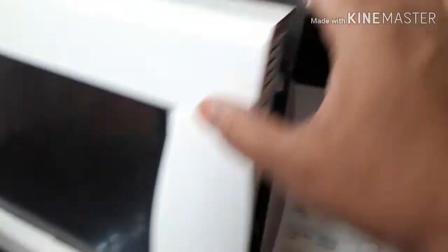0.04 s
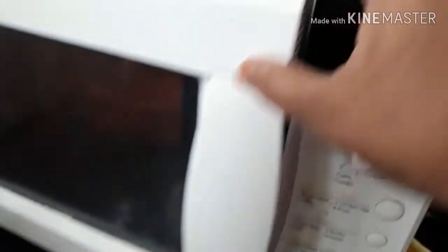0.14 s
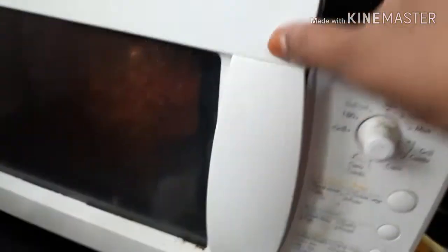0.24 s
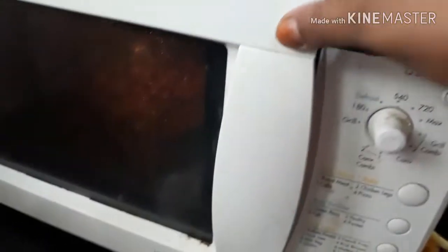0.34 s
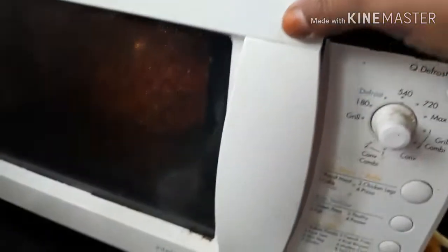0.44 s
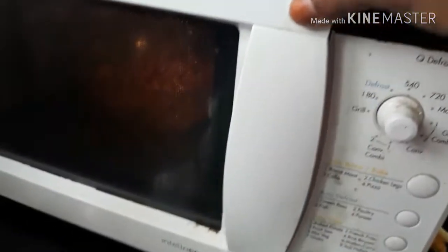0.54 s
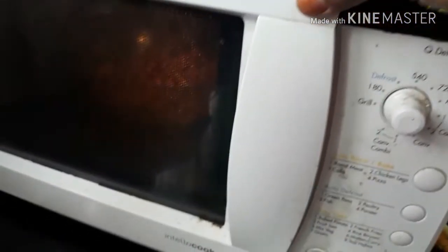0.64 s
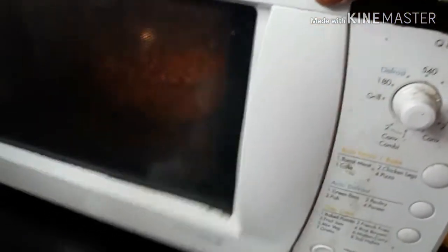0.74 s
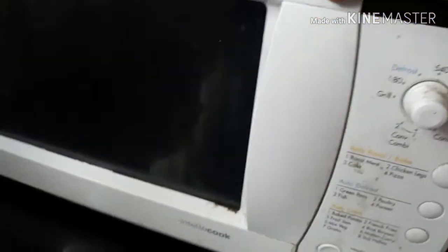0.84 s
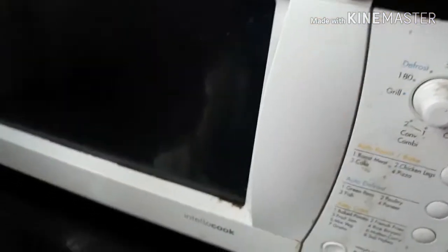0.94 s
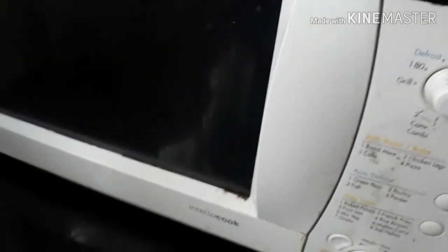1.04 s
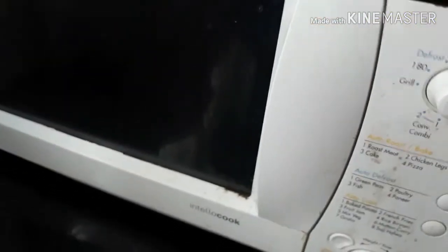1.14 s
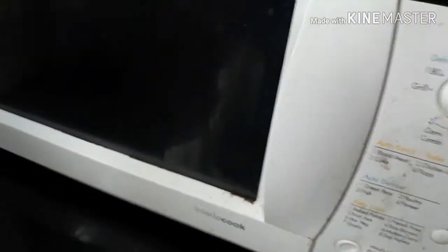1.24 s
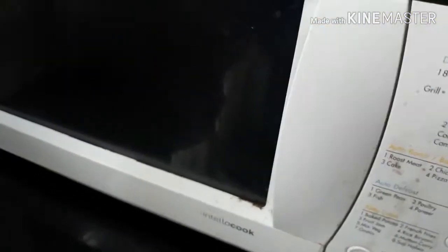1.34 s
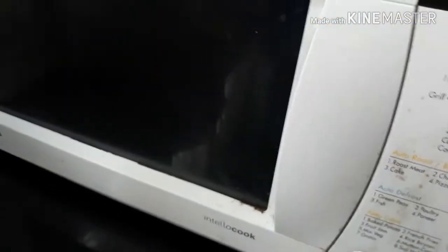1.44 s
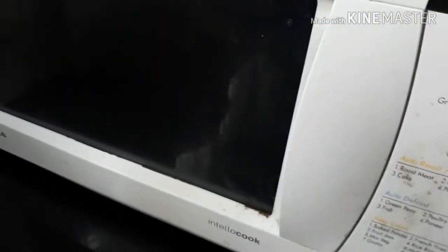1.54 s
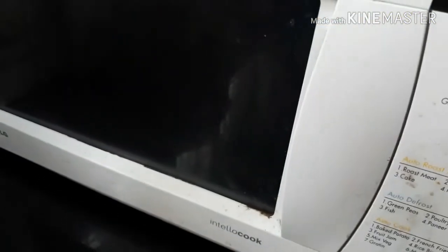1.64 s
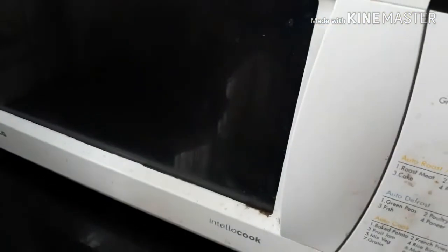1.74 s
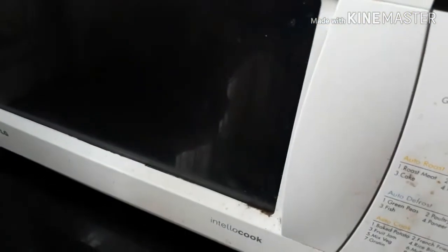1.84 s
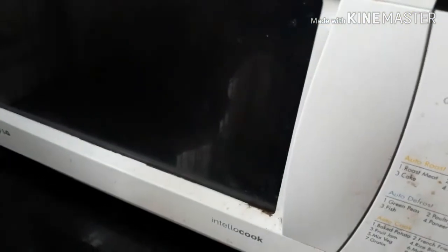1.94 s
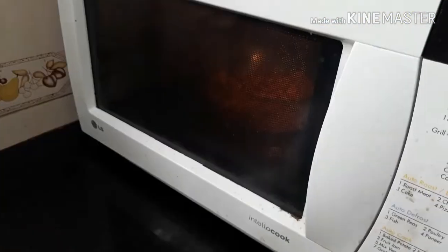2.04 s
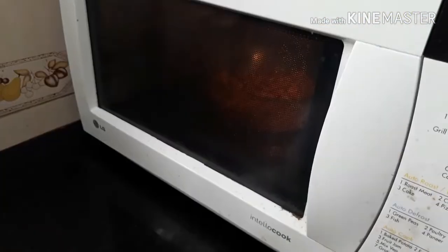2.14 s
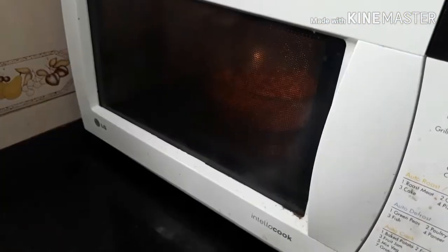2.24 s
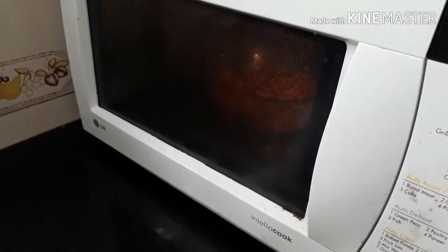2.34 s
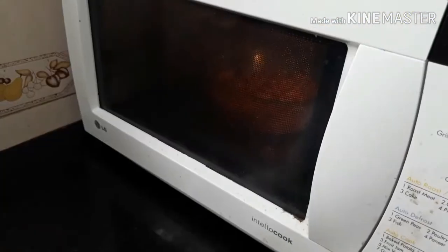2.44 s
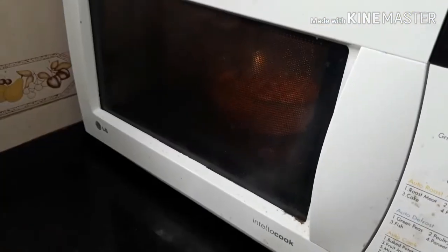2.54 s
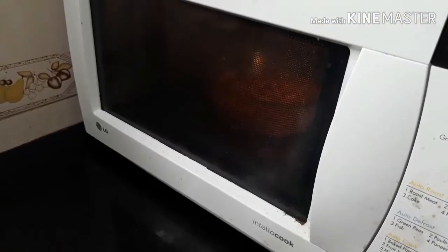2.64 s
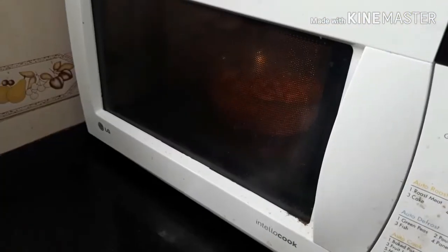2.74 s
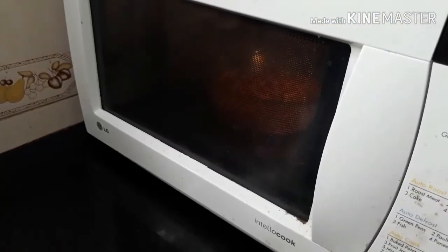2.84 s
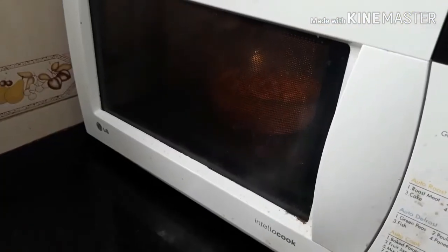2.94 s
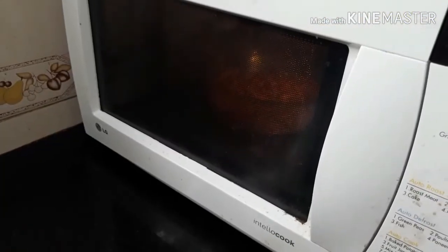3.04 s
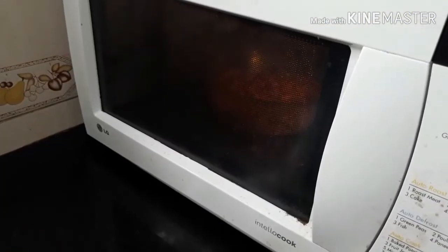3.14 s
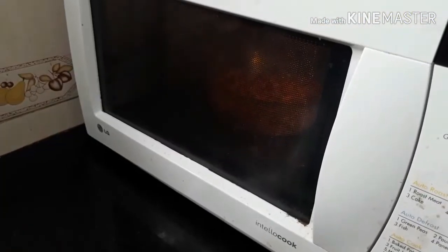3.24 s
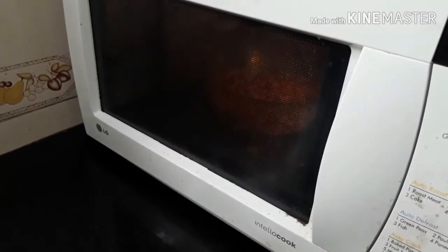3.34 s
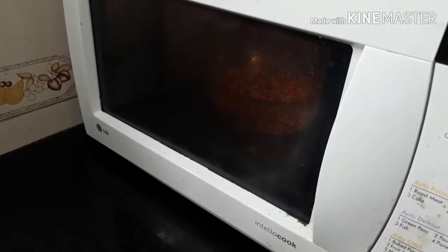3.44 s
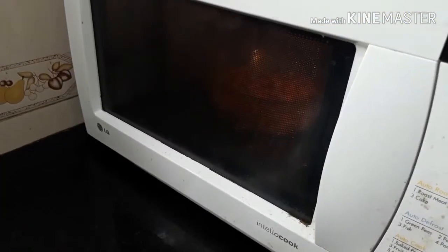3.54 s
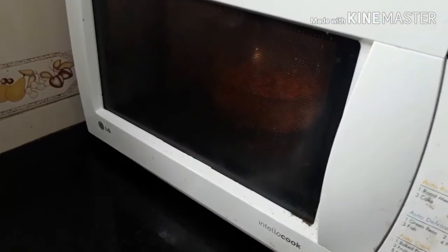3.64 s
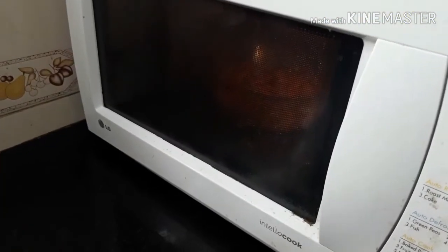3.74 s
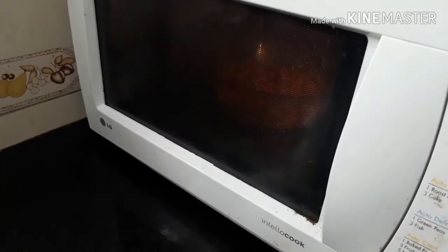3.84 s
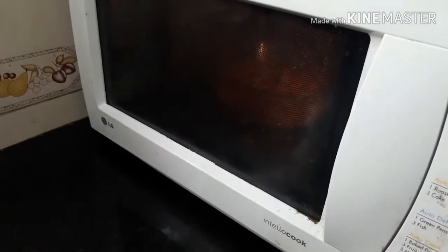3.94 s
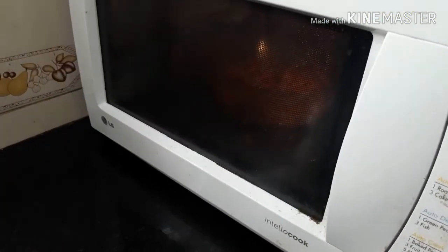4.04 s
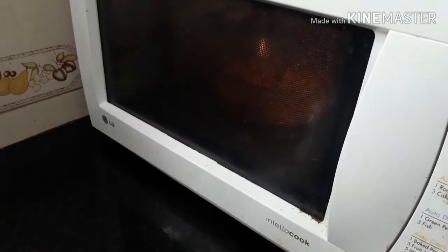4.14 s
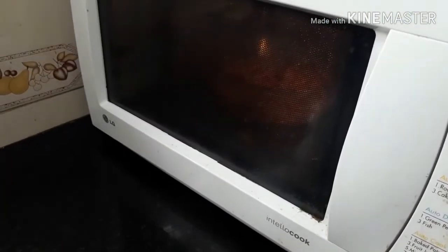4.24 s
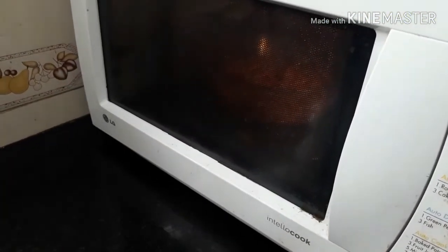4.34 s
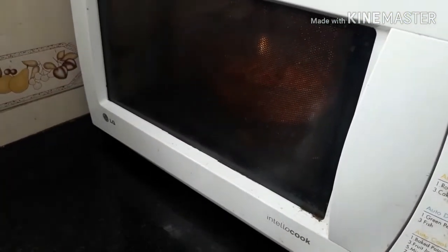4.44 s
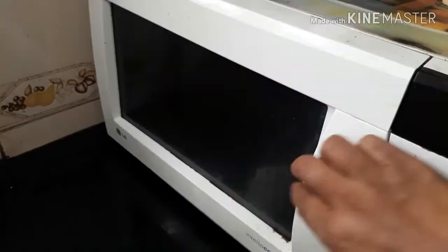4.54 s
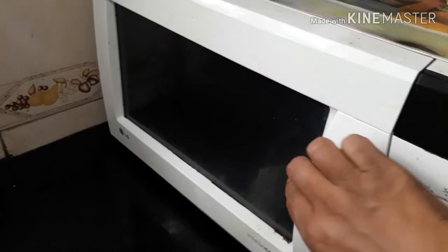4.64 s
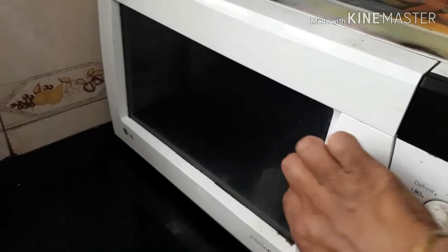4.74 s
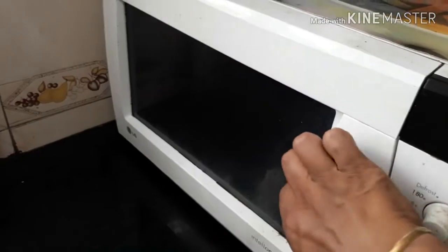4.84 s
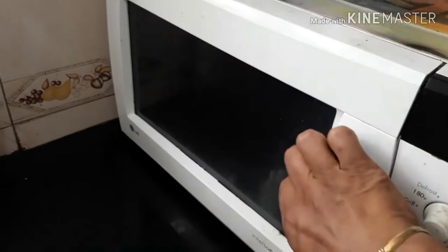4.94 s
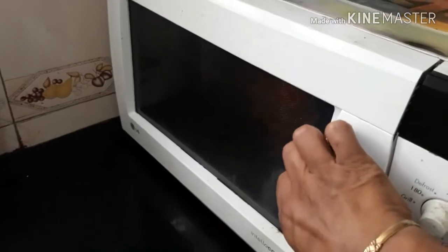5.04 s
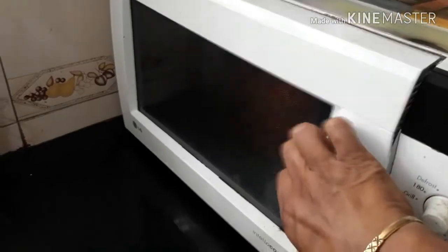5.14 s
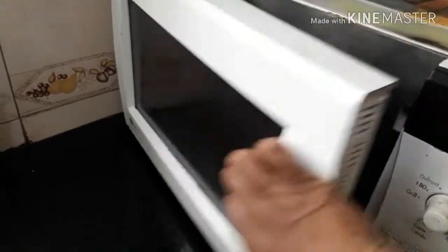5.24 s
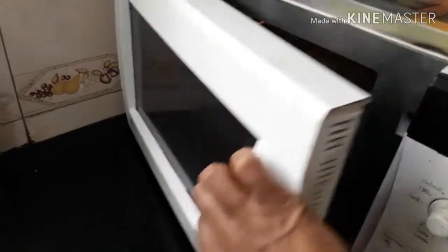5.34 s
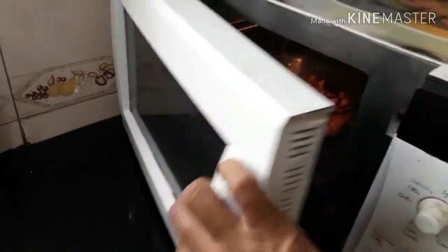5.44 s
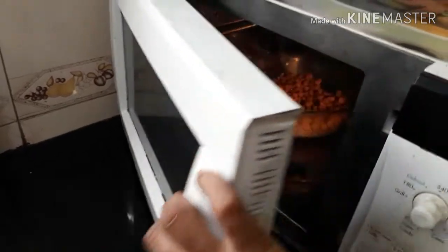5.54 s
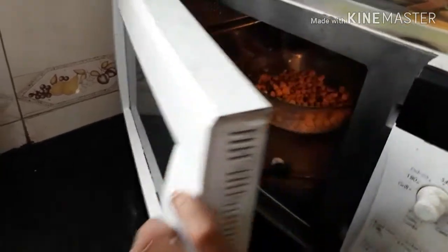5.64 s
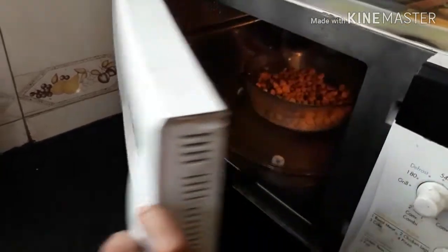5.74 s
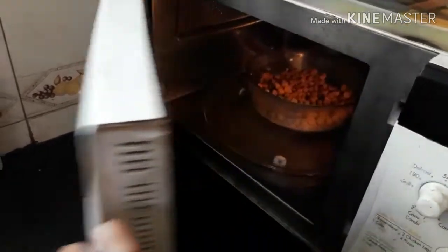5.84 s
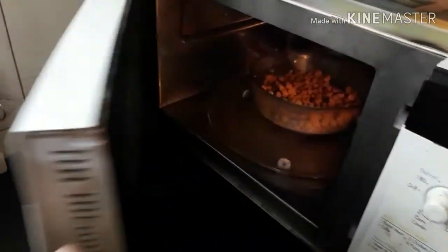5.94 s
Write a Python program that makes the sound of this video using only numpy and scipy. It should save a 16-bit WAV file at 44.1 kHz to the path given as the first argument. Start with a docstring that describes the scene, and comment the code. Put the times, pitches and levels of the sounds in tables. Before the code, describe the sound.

Sharp latch snaps and a hard door slam, a steady microwave hum with whirring fan, then clicking and a clunk as the door opens.

```python
"""A microwave oven in a tiled kitchen, heard from close by on a small microphone at three moments.
First the door is pushed to over a quiet room: its sprung latch snaps and it slams into the steel case.
After a short fade the oven runs: mains hum, fan tones and panel buzz from sines, rushing air from noise.
After another fade the latch creaks under a pull and the door jumps open amid a slowly swelling hiss;
last, a hand rubs on the swinging door. Blows are ringing modes with a rattle of noise bands."""
import sys
import numpy as np
from scipy import signal
from scipy.fft import rfft, irfft, next_fast_len
from scipy.io import wavfile

SR = 44100
rng = np.random.default_rng(int(sys.argv[2]) if len(sys.argv) > 2 else 0)


def output_pcm(signal):
    """Save a mono or channel-first signal as 16-bit PCM at the path in sys.argv[1].

    Samples are clipped to [-1, 1] before scaling.
    """
    pcm = np.clip(np.atleast_2d(signal).T, -1, 1) * 32767
    wavfile.write(sys.argv[1], SR, np.round(pcm).astype(np.int16))


N = 264159
TIME = np.arange(N) / SR
AGE = TIME[:2 * SR]   # seconds since a hit


def from_db(db):
    """Decibels to amplitude gain."""
    return 10 ** (np.asarray(db) / 20)


def rms_one(x):
    """Scale to unit rms."""
    return x / np.sqrt(np.mean(x ** 2) + 1e-20)


def at_hz(points, hz):
    """Read a table on a log-frequency axis."""
    f, value = np.transpose(points)
    return np.interp(np.log(hz + 1e-9), np.log(f), value)


def add(track, s, sound):
    """Mix a sound in at time s."""
    i = round(s * SR)
    track[i:i + len(sound)] += sound[:N - i]


def drift(rate_hz):
    """Smooth random wander of spread 1, slower for a lower rate."""
    size, step = 4096, 100   # one point every 100 samples
    hz = np.fft.rfftfreq(size, step / SR)
    slow = irfft(rfft(rng.standard_normal(size)) / (1 + (hz / rate_hz) ** 2))
    return np.interp(np.arange(N) / step, np.arange(len(slow)), rms_one(slow))


def noise(spectrum, resonances=(), ripple_db=2.0):
    """Steady noise of a given colour, raised or dipped at resonances and rippled by standing waves; rms 1."""
    size = next_fast_len(N)
    hz = np.fft.rfftfreq(size, 1 / SR)
    db = at_hz(spectrum, hz)
    for centre, width, top_db in resonances:
        db = db + top_db / (1 + (2 * (hz - centre) / width) ** 2)
    nodes = np.arange(800, 16000, 20)
    db = db + ripple_db * np.interp(hz, nodes, rng.standard_normal(len(nodes)), left=0)
    return rms_one(irfft(rfft(rng.standard_normal(size)) * from_db(db), size)[:N])


def tilt(hz, bass_db, treble_db, bass_hz=260, treble_hz=3200):
    """A heavy hit wakes the bass, a hard one the treble."""
    bass = bass_db / (1 + (hz / bass_hz) ** 4)
    treble = treble_db / (1 + (treble_hz / hz) ** 2)
    return bass + treble


# Reverberation of the tiled kitchen. Each row: frequency in Hz, time to fall 60 dB in seconds.
KITCHEN_REVERB = [(50, 0.68), (120, 0.81), (250, 0.88), (500, 0.55), (1000, 0.43), (3000, 0.41),
                  (7000, 0.32), (15000, 0.17)]


def rattle(spectrum, t60, room_db, spread, grit_db=0.0):
    """Countless modes, one row per third octave: a quick crack, gritty if asked, then the kitchen's tail."""
    edges = 2 ** (np.arange(15, 43) / 3)
    centres = np.sqrt(edges[1:] * edges[:-1])
    share = from_db(at_hz(spectrum, centres)) * np.sqrt(np.diff(edges))
    chatter_db = grit_db * drift(150)[:len(AGE)]   # loose parts buzz against each other
    rows = []
    for low, high, hz in zip(edges, edges[1:], centres):
        third_octave = signal.butter(2, [low, high], "band", fs=SR, output="sos")
        band = signal.sosfilt(third_octave, rng.standard_normal(len(AGE)))
        direct = from_db(chatter_db * hz / (hz + 1500)) * 1000 ** (-AGE / (t60 + 2 / hz))
        tail = from_db(room_db) * 1000 ** (-AGE / at_hz(KITCHEN_REVERB, hz))
        # bending waves: the lows arrive later; spread is the rise in seconds at 1 kHz
        rise = 1 - np.exp(-AGE / spread * (hz / 1000) ** .5)
        rows.append(rms_one(band) * rise * np.hypot(direct, tail))
    return centres, np.array(rows) * (share / np.linalg.norm(share))[:, None]


def ringing(hits, modes, swell_cycles=0.94):
    """Every hit feeds energy into every mode over about a cycle; each mode loses it at its own rate."""
    s, db, bass_db, treble_db = np.transpose(hits)
    at = np.round(s * SR).astype(int)
    out = np.zeros(N)
    for hz, mode_db, t60 in modes:
        hit_energy = from_db(db + mode_db + tilt(hz, bass_db, treble_db)) ** 2
        fed = np.bincount(at, hit_energy, N) + 1e-20
        ease = np.exp(-hz / (swell_cycles * SR))   # rise of the energy, per sample
        loss = 1e-6 ** (1 / (t60 * SR))   # energy kept, per sample
        energy = signal.lfilter([1 - ease], np.poly([ease, loss]), fed)
        out += np.sqrt(np.abs(energy)) * np.sin(2 * np.pi * (hz * TIME + rng.random()))
    return out


def strike(hits, modes, panels, scatter_db=3.5):
    """Each hit rattles the panels and sets the strong modes ringing."""
    hz, bands = panels
    out = ringing(hits, modes)
    for s, db, bass_db, treble_db in hits:
        band_db = db + tilt(hz, bass_db, treble_db) + rng.normal(0, scatter_db, len(hz))
        add(out, s, from_db(band_db) @ bands)
    return out


# Snaps of the sprung latch, closing and then opening. Each row: start in seconds, level in dB.
LATCH_SNAPS = [(0.22, -48), (0.2639, -14.5), (0.2743, -15), (0.4100, -17), (0.4151, -18), (0.451, -21),
               (0.5259, -19.5), (0.8016, -9), (4.9211, -30.5), (4.961, -20.5), (4.9898, -15), (5.0213, -18),
               (5.0759, -22.5), (5.1645, -19), (5.1959, -19.5)]
# The small stiff latch parts. Each row: frequency in Hz, relative level in dB, time to fall 60 dB in seconds.
LATCH_PARTS = [(3700, -15, .02), (5500, -13, .02), (6550, -11, .04), (7050, -9, .025), (7450, -1, .022),
               (8300, -8, .015), (9100, -9, .016), (10150, -7, .016), (11900, -10, .014), (13700, -7, .016),
               (14800, -14, .012)]
# Dense rattle of the latch. Each row: frequency in Hz, relative level in dB per Hz.
LATCH_RATTLE = [(500, -17.5), (1700, -9.5), (2500, -18.5), (3700, -13.5), (5200, -11.5), (7300, -3),
                (9300, -14.5), (13700, -8), (16000, -25)]


def latch(modes_db=-3, crack_db=-1, scatter_db=1.0):
    """The latch sticks and snaps; each snap rings its small parts for a few milliseconds."""
    hz, mode_db, t60 = np.transpose(LATCH_PARTS)[:, :, None]
    signs = (-1) ** np.arange(len(hz))[:, None]
    decay = 1000 ** (-AGE / t60)
    modes = signs * from_db(mode_db) * decay * np.sin(2 * np.pi * hz * AGE)
    _, bands = rattle(LATCH_RATTLE, t60=0.022, room_db=-17.5, spread=0.0039)
    crack = from_db(crack_db) * bands.sum(axis=0)
    out = np.zeros(N)
    for s, db in LATCH_SNAPS:
        gains = from_db(modes_db + rng.normal(0, scatter_db, len(hz)))
        add(out, s, from_db(db) * (gains @ modes + crack))
    return out


# Blows of the door on the case, first as it meets the latch, then as it slams.
# Each row: start in seconds, level in dB, extra bass in dB, extra treble in dB.
DOOR_BLOWS = [(0.2556, -22.5, -7.5, 1.5), (0.2746, -38, 7, -2.5), (0.323, -38.5, -10.5, 2),
              (0.338, -36, -0.5, 1), (0.366, -41.5, 2.5, -5.5), (0.724, -55, 19, -13.5),
              (0.7612, -27.5, -3, -6), (0.7880, -20.5, 8, 14), (0.7990, -10.5, -1.5, -8.5),
              (0.8040, -24, 11.5, -8.5), (0.8114, -16.5, -1, -11), (0.829, -31, 12.5, -7.5),
              (0.854, -23, 0.5, 2.5), (0.895, -35, 2, 3), (1.4377, -59, 12, -15)]
# Ringing of the steel case and the cavity.
# Each row: frequency in Hz, relative level in dB, time to fall 60 dB in seconds.
CASE_RINGING = [(104, -5, .58), (119, -6, .66), (133, -9, .72), (178, -11, .45), (198, -22, .8),
                (248, -8.5, .27), (285, -24, 1.1), (328, -3, .19), (371, -10, .3), (431, -14, .46),
                (536, -19.5, .6), (619, -14, .42), (791, -18, .42), (818, -22, .55), (938, -17, .42),
                (980, -19, .5), (1087, -18, .45), (1480, -42, 1.3), (1728, -23, .42), (2060, -24, .35),
                (2223, -25, .3), (2410, -24, .32), (3099, -26, .25), (4000, -22, .2)]
# Thin steel parts that sing on after a blow.
# Each row: frequency in Hz, relative level in dB, time to fall 60 dB in seconds.
THIN_STEEL = [(1577, -49, 4.2), (4264, -46, 1.5), (4538, -46, 1.4), (4678, -46.5, 1.5)]
# Dense rattle of the case. Each row: frequency in Hz, relative level in dB per Hz.
CASE_RATTLE = [(35, -24), (65, -7), (110, 4), (220, -3), (350, -5.5), (550, -4), (1000, -7), (1800, -10),
               (3000, -16), (5000, -14.5), (7400, -16), (9800, -29), (15500, -31)]
KNOCK_DB = -26   # share of every snap that passes into the case


def case():
    """The case takes the blows of the door, and a small knock from every snap of the latch."""
    knocks = [(s, db + KNOCK_DB, -8, 0) for s, db in LATCH_SNAPS]
    panels = rattle(CASE_RATTLE, t60=0.087, room_db=-5.0, spread=0.0018)
    return strike(DOOR_BLOWS + knocks, CASE_RINGING + THIN_STEEL, panels)


# Kitchen background while the door is shut. Each row: frequency in Hz, relative level in dB per Hz.
QUIET_KITCHEN = [(30, -39), (60, -17.5), (90, 3), (135, -11.5), (210, -3.5), (320, -16.5), (600, -17.5),
                 (1300, -23), (2700, -29), (4700, -36.5), (6900, -31), (8300, -39.5), (9500, -45),
                 (15500, -44)]
QUIET_DB = -52   # rms


def quiet_kitchen():
    """The still room around the closing door: steady coloured noise."""
    return from_db(QUIET_DB) * noise(QUIET_KITCHEN)


def tone(turns, db, waver_db):
    """A sine of given rms level whose strength wavers."""
    gain = np.sqrt(2) * from_db(db + waver_db * drift(3.6))
    return gain * np.sin(2 * np.pi * (turns + rng.random()))


# Transformer hum. Each entry: multiple of the mains frequency, rms level in dB before the running gain.
HUM_TONES = {2: -41.5, 4: -43.5, 8: -64, 10: -72, 12: -61, 15: -71, 16: -59.5, 22: -65, 24: -64.5}
# Eight-bladed fan. Each entry: multiple of its turning rate, rms level in dB before the running gain.
FAN_TONES = {3: -66, 4: -52.5, 5: -56.5, 6: -57, 7: -62, 8: -46.5, 9: -58.5, 12: -64, 13: -63, 16: -54, 18:
             -63, 20: -62}
# Panels buzzing at their own pitch. Each row: frequency in Hz, rms level in dB before the running gain.
PANEL_BUZZ = [(243.1, -51), (879.3, -60), (2695, -82), (4385, -80), (4490, -80)]
# Air through the running oven. Each row: frequency in Hz, relative level in dB per Hz.
RUSHING_AIR = [(30, -9), (70, -11.5), (105, 1.5), (180, 0.5), (330, -2), (460, -5.5), (620, -2.5),
               (1300, -10.5), (2200, -10), (3200, -21), (5500, -23), (7200, -21), (9600, -34.5),
               (15500, -42)]
# Resonances and dips of the air duct. Each row: frequency in Hz, width in Hz, boost or dip in dB.
AIR_DUCT = [(729, 75, 6), (902, 52, 5.5), (985, 27, -3.5), (1081, 26, 10.5), (1114, 54, -1),
            (1344, 110, 3.5), (1560, 120, -1.5), (1700, 170, 3.5), (2220, 460, -1), (3800, 1200, 4.5)]
MAINS_HZ, FAN_HZ = 49.94, 43.3
# the oven gets up to power: tones and air start low and settle on their running gain
SWITCH_ON_S, RUN_UP_S = 2.1, 0.2
TONES_DB, TONES_START_DB = 1.04, -6   # running gain, and the start relative to it
AIR_DB, AIR_START_DB = -42.5, -4


def oven(speed_wander=0.00089, flutter_db=0.37, chop_depth=0.05, wobble_turns=0.0046):
    """The transformer is locked to the mains; the fan wanders and wobbles a little and chops the air it blows."""
    shortfall = np.exp(-np.maximum(TIME - SWITCH_ON_S, 0) / RUN_UP_S)
    tones_db = TONES_DB + TONES_START_DB * shortfall
    air_db = AIR_DB + AIR_START_DB * shortfall
    speed_hz = FAN_HZ * (1 + speed_wander * drift(0.96))
    turns = np.cumsum(speed_hz) / SR + wobble_turns * drift(25)
    hum = sum(tone(k * MAINS_HZ * TIME, db, waver_db=.5) for k, db in HUM_TONES.items())
    fan = sum(tone(k * turns, db, waver_db=2.1) for k, db in FAN_TONES.items())
    buzz = sum(tone(hz * TIME, db, waver_db=2.5) for hz, db in PANEL_BUZZ)
    chop = 1 + chop_depth * np.sin(2 * np.pi * 4 * turns)   # four times a turn
    air = from_db(air_db + flutter_db * drift(9)) * chop * noise(RUSHING_AIR, AIR_DUCT)
    return from_db(tones_db) * (hum + fan + buzz) + air


# Background hiss while the door is opened. Each row: frequency in Hz, relative level in dB per Hz.
OPENING_HISS = [(30, -28.5), (100, -4), (200, -0.5), (380, 1), (600, -4), (900, -5), (2000, -8.5),
                (2900, -11), (5000, -13.5), (6800, -10), (8300, -16), (9400, -23.5), (11500, -24.5),
                (15500, -34)]
REACH_S, HISS_DB, HISS_SWELL_DB_PER_S = 4.57, -45, 2.5   # the level is that at the reach


def hiss():
    """Coloured noise that swells slowly, at its set level when the door is reached for."""
    return from_db(HISS_DB + HISS_SWELL_DB_PER_S * (TIME - REACH_S)) * noise(OPENING_HISS)


# Jolts of the door as it is pulled and jumps free.
# Each row: start in seconds, level in dB, extra bass in dB, extra treble in dB.
DOOR_JOLTS = [(4.905, -46, 14, 3), (4.9211, -39, -9, 3), (4.998, -41, 15.5, -4), (5.010, -45.5, 13, -8),
              (5.024, -34.5, -15, 6.5), (5.036, -37, 9.5, -10), (5.048, -31, -13, -5),
              (5.206, -28.5, -7, -12), (5.2198, -16.5, -8.5, -2.5), (5.2420, -15.5, -16.5, -0.5),
              (5.2495, -21, -5.5, -28), (5.260, -20.5, -5.5, -11), (5.314, -31.5, -6, 1.5)]
# Ringing of the door itself. Each row: frequency in Hz, relative level in dB, time to fall 60 dB in seconds.
DOOR_RINGING = [(108, -19, .5), (138, -13, .5), (162, -15, 1.9), (246, -19, .35), (351, -2, .2),
                (378, -11, .4), (470, -18, .3), (560, -21, .54), (819, -15, .35), (861, -12, .2),
                (945, -12, .33), (1147, -17, .35), (1287, -14, .22), (1365, -24, .4), (1475, -25, .34),
                (2130, -22, .25), (4150, -17, .15)]
# Dense rattle of the door. Each row: frequency in Hz, relative level in dB per Hz.
DOOR_RATTLE = [(40, -23), (110, 5.5), (220, -4), (350, -6.5), (600, -5.5), (1150, -7), (1600, -8.5),
               (2200, -9), (3000, -12), (4300, -10.5), (7400, -9.5), (9800, -18.5), (15500, -23)]


def door():
    """The door is lighter than the case and rings in its own modes when it is jerked."""
    panels = rattle(DOOR_RATTLE, t60=0.062, room_db=-4.0, spread=0.0014)
    return strike(DOOR_JOLTS, DOOR_RINGING, panels)


# Strokes of the hand over the swinging door. Each row: start in seconds, length in seconds, level in dB.
HAND_STROKES = [(5.569, .22, -50.5), (5.883, .12, -48.5)]
# Colour of the rubbing skin. Each row: frequency in Hz, relative level in dB per Hz.
HAND_RUB = [(300, -26.5), (1200, -4.5), (2300, -1.5), (3500, -13), (6500, 9), (9000, -4), (11500, -5.5),
            (15500, -13)]
STROKE_EDGE_S = .035   # a stroke sets in and dies away over this time


def hand(grain_db=2.5):
    """Skin slides unevenly over the plastic; each stroke sets in, holds and lets go."""
    pressure = np.zeros(N)
    for s, length, db in HAND_STROKES:
        to_edge = np.minimum(TIME - s, s + length - TIME)
        pressure += from_db(db) * np.clip(to_edge / STROKE_EDGE_S, 0, 1)
    return pressure * from_db(grain_db * drift(60)) * noise(HAND_RUB)


def fade(start, end, fade_in):
    """Gain of one moment: up before its start, held, and quickly down after its end."""
    fade_out = 0.015   # seconds per 60 dB
    early = np.maximum(start - TIME, 0) / fade_in
    late = np.maximum(TIME - end, 0) / fade_out
    return from_db(-60 * (early + late))


# The three moments: closing, running, opening.
# Each row: start in seconds, end in seconds, fade-in in seconds per 60 dB.
THREE_MOMENTS = [(0, 1.938, 0.4), (2.087, 4.563, .042), (4.713, 6, 0.18)]


def scene():
    """Closing, running and opening follow each other, each with its own background."""
    first, second, third = (fade(*moment) for moment in THREE_MOMENTS)
    handling = latch() + case() + door()
    closing = handling + quiet_kitchen()
    opening = handling + hiss() + hand()
    return (first * closing + second * oven() + third * opening)[None]


def record(dry, low_cut_hz=62, top_cut_hz=15700):
    """A small microphone close by: no deep bass, rounded peaks, the top cut off."""
    low_cut = signal.butter(2, low_cut_hz, "high", fs=SR, output="sos")
    top_cut = signal.ellip(10, .1, 80, top_cut_hz, fs=SR, output="sos")
    rounded = np.tanh(signal.sosfilt(low_cut, dry))
    return signal.sosfilt(top_cut, rounded)


dry = scene()
out = record(dry)
output_pcm(out)
```